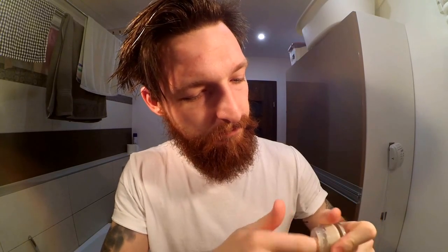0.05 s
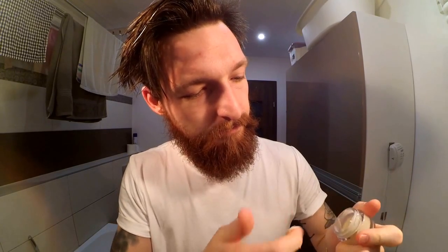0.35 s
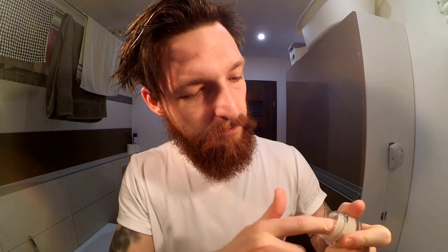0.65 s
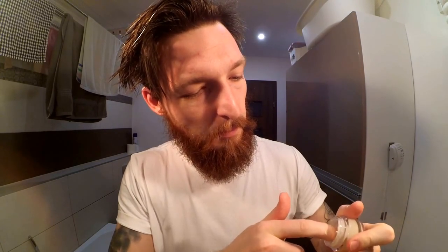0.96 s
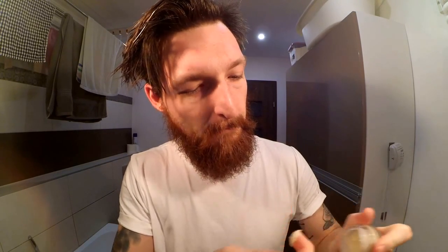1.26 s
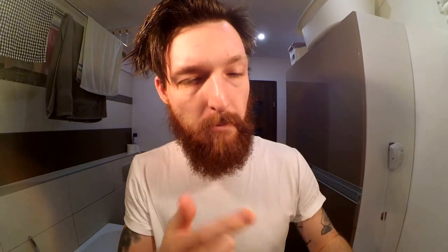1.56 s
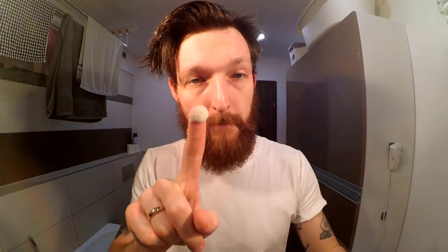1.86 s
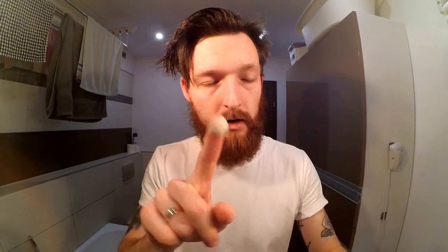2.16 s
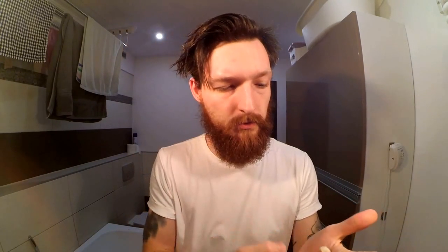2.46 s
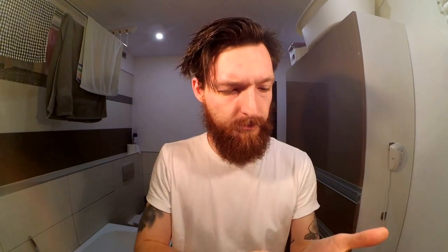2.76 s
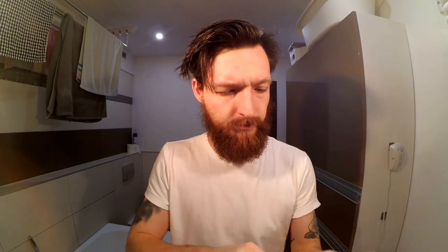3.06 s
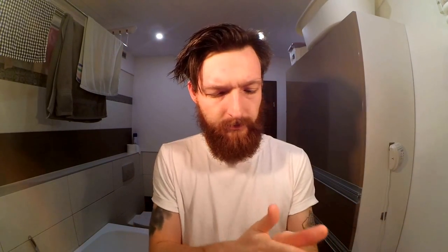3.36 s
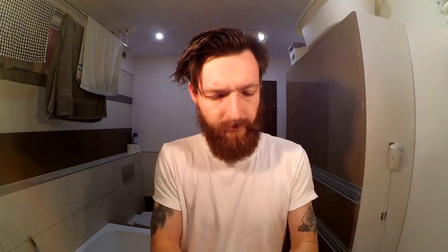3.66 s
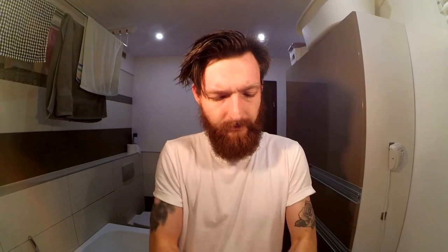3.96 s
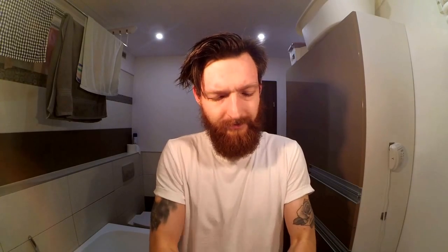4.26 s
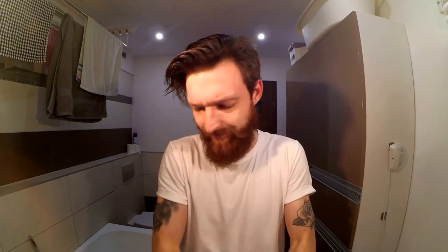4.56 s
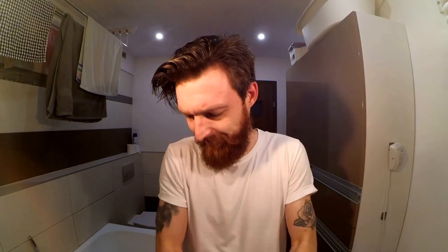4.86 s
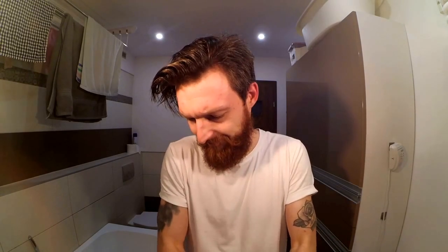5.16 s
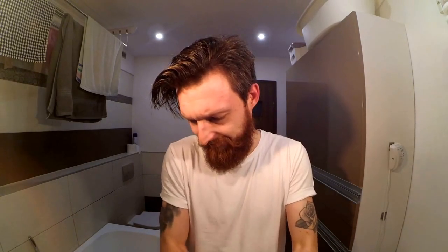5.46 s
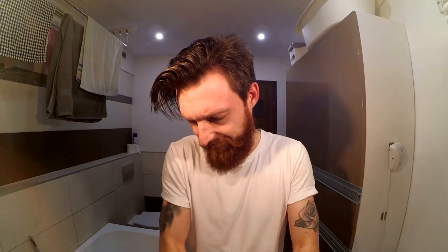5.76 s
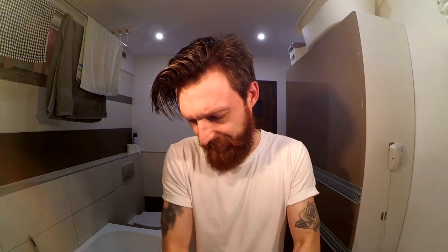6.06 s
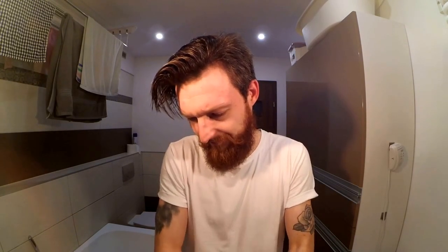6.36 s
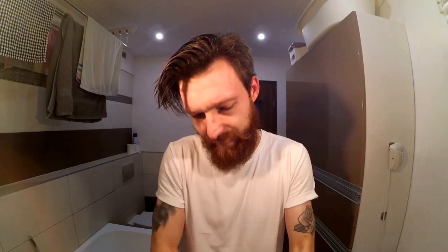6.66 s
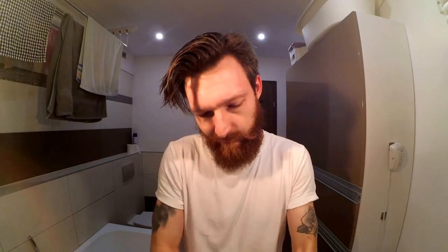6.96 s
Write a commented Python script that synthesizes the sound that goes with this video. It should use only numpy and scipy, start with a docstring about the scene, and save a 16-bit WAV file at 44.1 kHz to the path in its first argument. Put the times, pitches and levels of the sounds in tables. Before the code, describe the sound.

Faint sticky ticks, one hard ringing knock of a jar set down, then a light clap and quick, hissing hand rubbing.

```python
"""Hair product in a tiled bathroom

A finger scoops product from a little jar, with a skid and a few sticky ticks. The jar is set down
hard and rings with the counter. The palms clap together and rub back and forth, hissing, while the
pocket of air between them sounds hollow. A faint hum and a slow rumble lie underneath."""
import sys
import numpy as np
from scipy import signal
from scipy.fft import rfft, irfft
from scipy.io import wavfile
from scipy.ndimage import uniform_filter1d

SR = 44100
rng = np.random.default_rng(int(sys.argv[2]) if len(sys.argv) > 2 else 0)


def dump(signal):
    """Clip the signal to [-1, 1] and save it as 16-bit WAV at the path in sys.argv[1]."""
    limited = np.clip(np.atleast_2d(signal).T, -1, 1)
    pcm = np.round(limited * 32767).astype(np.int16)
    wavfile.write(sys.argv[1], SR, pcm)


N = 317961
TIME = np.arange(N) / SR
SHOT_TIME = np.arange(SR // 2) / SR  # half a second, for one-shots and tails

# Palm strokes, back and forth in turn. Each row: moment of top speed in seconds, length in seconds,
# friction level in dB, level of the hollow in dB.
STROKES = [(3.483, .07, -56.5, -78), (3.68, 0.11, -55, -85), (3.855, 0.086, -59.5, -74),
           (4.065, 0.08, -54, -57), (4.189, 0.039, -50.5, -60.5), (4.352, 0.062, -51.5, -52.5),
           (4.494, 0.054, -53, -57), (4.653, 0.056, -53, -50.5), (4.808, 0.044, -51.5, -57.5),
           (4.981, 0.055, -53, -48), (5.137, 0.061, -54.5, -54), (5.317, 0.052, -52.5, -54.5),
           (5.484, 0.054, -53, -55), (5.706, 0.1, -59.5, -63), (5.862, 0.072, -55.5, -61),
           (6.082, 0.14, -60, -54), (6.272, 0.049, -56.5, -58), (6.466, 0.093, -57.5, -58.5),
           (6.629, 0.049, -53.5, -49.5), (6.797, 0.091, -62.5, -81), (6.957, 0.056, -58, -62),
           (7.119, 0.082, -59, -76)]
# Smooth hiss and coarser rasp of skin. Each row: frequency in Hz, relative level in dB.
HISS_EQ = [(300, -11.5), (1000, -23.5), (2500, -22.5), (4500, -3.5), (6000, -5.5), (7800, -4.5),
           (10000, -6), (13000, -8.5), (15500, -11)]
RASP_EQ = [(300, -7), (800, -2), (1700, -2.5), (2300, -4.5), (3200, -2), (4500, -1), (5600, -3), (7500, -2),
           (15000, -21)]
# The palms roughen as the product works in. Each row: time in seconds, dryness as rasp gain in dB.
DRYNESS = [(3.6, -15), (4.2, -3.5), (6.7, -2), (7.1, 1.5)]
# Wet palms swish, drying palms grab. Each row: centre in Hz, width in Hz, level in dB,
# dB gained per dB of dryness.
SKIN_BANDS = [(7400, 2900, -17, -0.97), (3350, 2200, -7, 5.5)]

def rubbing(hiss_db, rasp_db, crackle_db=-11, snaps_per_s=500, back_db=0.5, turn_db=-9, ring_db=-18.5):
    """Skin ridges slip past each other, rasping most at top speed; threads of tacky film snap."""
    swell_share, rasp_power = 0.63, 1.69
    speeds = np.array([slide(TIME - s, swell_share * length, (1 - swell_share) * length)
                       for s, length, _, _ in STROKES])
    force = amp([db for _, _, db, _ in STROKES])
    grip = force * amp(back_db * (np.arange(len(STROKES)) % 2 == 0))  # more rasp on the way back
    glide = np.sqrt(force ** 2 @ speeds ** 2)
    scrape = np.sqrt(grip ** 2 @ speeds ** (2 * rasp_power))
    dry_db = np.interp(TIME, *np.transpose(DRYNESS))
    snaps = rng.standard_normal(N) * (rng.random(N) < snaps_per_s / SR)
    crackle = unit(signal.fftconvolve(snaps, pulse(TICK_EQ))[:N])
    coarse = amp(dry_db) * (amp(rasp_db) * noise(RASP_EQ) + amp(crackle_db) * crackle)
    colour = sum(amp(db + slope * dry_db) * band(hz, width) for hz, width, db, slope in SKIN_BANDS)
    skin = amp(hiss_db) * glide * noise(HISS_EQ) + scrape * (coarse + colour)
    # A little rasp and a low ring near 470 Hz carry through the turns.
    effort = uniform_filter1d(glide, 22000)
    contact = effort * (amp(turn_db) * noise(RASP_EQ) + amp(ring_db) * band(*CLAP_RINGS[1][:2]))
    return (skin + contact) * flutter(depth_db=1.4, size=16) * flutter(depth_db=1.25, size=260)


# The hollow on the way back, then forth. Each row: base pitch in Hz, rise in octaves per second,
# swell and fade time in seconds, lead on top speed in seconds.
HOLLOWS = [(1130, 11, 0.0079, .011), (1270, 3.3, 0.017, 0.00101)]

def air_pocket(level_db, relative_width, usual_squeeze_db=-55, octaves_per_db=.026):
    """Each stroke rings the hollow between the palms, higher as it closes and with a harder squeeze."""
    out, t = np.zeros(N), SHOT_TIME - SHOT_TIME.mean()
    for k, (s, _, _, db) in enumerate(STROKES):
        hz, octaves_per_s, length, lead = HOLLOWS[k % 2]
        closing = octaves_per_s * np.clip(t, -2 * length, 2 * length)
        pitch = hz * 2 ** (closing + octaves_per_db * (db - usual_squeeze_db))
        hollow = band(pitch, relative_width * hz, len(t))
        add(out, s - lead + t[0], amp(db + level_db) * hollow * slide(t, length, length))
    return out


# The jar lands, rim first. Each row: start in seconds, gain in dB.
KNOCKS = [(1.9793, -33.5), (1.989, 1.4)]
# The attack of the knock. Each row: frequency in Hz, relative level in dB.
BLOW_EQ = [(100, -28), (260, -13), (480, -7.5), (900, -10), (1400, -3), (2300, -3), (3700, 2.5),
           (4700, -5.5), (5600, -13.5), (8000, -23.5), (11000, -30), (16000, -35)]
# The ring of jar and counter. Each row: pitch in Hz, relative level in dB, seconds to fall 60 dB.
JAR_MODES = [(431.6, -36, .2), (669, -31, 0.26), (740, -40, 0.17), (1306, -23.5, 0.06), (1750, -31, 0.13),
             (2629, -29.5, 0.099), (2778, -33, .07), (3270, -32, .07), (3900, -29, .08), (3964, -28, .12),
             (4930, -35, .07)]

def jar_knock(ring_db):
    """A hard blow sets jar and counter ringing."""
    hit = amp(ring_db) * sum(amp(db - 60 * SHOT_TIME / t60) * np.sin(2 * np.pi * hz * SHOT_TIME)
                             for hz, db, t60 in JAR_MODES)
    add(hit, 0, -pulse(BLOW_EQ))
    out = np.zeros(N)
    for s, db in KNOCKS:
        add(out, s, amp(db) * hit)
    return out


# The hands meet, fingers first. Each row: start in seconds, level in dB, decay in seconds.
CLAPS = [(3.3613, -51.5, 0.0025), (3.3688, -37.5, 0.01)]
# The tone of the clap. Each row: frequency in Hz, relative level in dB.
CLAP_EQ = [(100, 7), (300, 4), (700, 5), (1300, -7), (1900, 10.5), (2400, -18), (3000, -4), (3800, 5.5),
           (5500, -6.5), (9000, -9.5), (15000, -22)]
# Rings stirred by the clap; the rubbing also stirs the low one near 470 Hz.
# Each row: pitch in Hz, width in Hz, relative level in dB.
CLAP_RINGS = [(250, 130, -9), (468.6, 53, -3), (840, 120, -19), (1620, 100, -6), (1955, 45, -7)]

def clap(ring_db):
    """A short puff of air is squeezed from between the palms and stirs a few brief rings."""
    puff, colour = np.zeros(N), pulse(CLAP_EQ)
    for s, db, decay_s in CLAPS:
        add(puff, s, amp(db) * rng.standard_normal(len(SHOT_TIME)) * np.exp(-SHOT_TIME / decay_s))
    rings = sum(amp(db + ring_db) * unit(resonate(puff, hz, width)) for hz, width, db in CLAP_RINGS)
    return signal.fftconvolve(puff, colour / np.linalg.norm(colour))[:N] + puff.std() * rings


# Sticky snaps, the jar touching down, the fingers meeting before the clap.
# Each row: start in seconds, peak in dB, tilt above 1 kHz in dB per octave.
TICKS = [(0.187, -46, -6), (1.2633, -27.5, -2), (1.484, -50, -17), (1.6306, -42.5, -10),
         (1.793, -39.5, -11), (1.9795, -34.5, -2), (3.3615, -39.5, 4), (4.556, -52, -3), (5.177, -43, -15)]
# The tone of one tick. Each row: frequency in Hz, relative level in dB.
TICK_EQ = [(300, -24), (1800, -25.5), (3400, -3), (5000, -11), (7200, 0), (10000, -15.5), (13000, -3),
           (16000, -35)]

def small_ticks(scoop_end_s=3.3, faint_per_s=9, faint_db=-47.5):
    """Sticky snaps and light touches tick, with fainter ticks at random while the finger scoops."""
    faint = rng.random(N) * (rng.random(N) < faint_per_s / SR) * (TIME < scoop_end_s)
    out = amp(faint_db) * signal.fftconvolve(faint, pulse(TICK_EQ))[:N]
    for s, db, tilt_db in TICKS:
        add(out, s, amp(db) * pulse(TICK_EQ, tilt_db))
    return out


# The jar wall under a finger. Each row: pitch in Hz, width in Hz, relative level in dB.
WALL_MODES = [(2086, 86, -6.5), (3220, 84, -2.5), (4080, 120, -1.5), (6150, 2100, -1), (8000, 5700, -14)]

def finger_skid(at_s, db, swell_s, fade_s, slips_per_s):
    """A quick run of slips rings the wall of the jar."""
    slips = (rng.random(N) < slips_per_s / SR) + .02 * rng.standard_normal(N)
    slips -= slips.mean()
    wall = sum(amp(mode_db) * unit(resonate(slips, hz, width)) for hz, width, mode_db in WALL_MODES)
    return amp(db) * unit(wall) * slide(TIME - at_s, swell_s, fade_s)


# Weight under knock and clap. Each row: start in seconds, level in dB, pitch in Hz, decay in seconds.
THUDS = [(1.979, -30.5, 303, 0.0032), (2.003, -30, 48, 0.056), (2.006, -36.5, 103.4, .07),
         (2.217, -35.5, 30.9, 0.12), (3.3691, -26.5, 120.4, 0.0037)]

def thuds():
    """Soft low pushes of the jar on the counter and of palm on palm die away quickly."""
    out = np.zeros(N)
    for s, db, hz, decay_s in THUDS:
        add(out, s, -amp(db) * np.sin(2 * np.pi * hz * SHOT_TIME) * np.exp(-SHOT_TIME / decay_s))
    return out


# Slaps off counter, mirror and near walls. Each row: delay in seconds, level in dB.
ECHOES = [(.0009, -14.5), (.0014, -13), (.0031, -5.5), (.0041, -15), (.0052, -7), (.0157, -10.5)]

def near_walls(x, scatter_s=0.0026):
    """Hard surfaces around the jar return early echoes, each trailed by a little scatter."""
    echoes = np.zeros(len(SHOT_TIME))
    for delay, db in ECHOES:
        echo = rng.standard_normal(len(SHOT_TIME)) * np.exp(-SHOT_TIME / scatter_s) / 10
        echo[0] = 1
        add(echoes, delay, amp(db) * echo)
    return x + signal.fftconvolve(x, echoes)[:N]


# The bathroom's tail. Each row: frequency in Hz, seconds to fall 60 dB.
ROOM_T60 = [(100, .45), (500, .4), (1000, .31), (3500, .3), (6000, .27), (12000, .25)]

def room(x, wet_db, build_s=0.002, tap_chance=1 / 8):
    """Dense reflections off the tiles build up quickly and die band by band."""
    size = len(SHOT_TIME)
    taps = rng.choice([-1., 1.], size) * (rng.random(size) < tap_chance)
    hz, t, spectrum = signal.stft(taps, SR, nperseg=256)
    decay = amp(-60 * t / curve_at(ROOM_T60, hz)[:, None])
    tail = signal.istft(spectrum * decay, SR)[1][:size]
    tail *= 1 - np.exp(-(SHOT_TIME / build_s) ** 2)
    return x + amp(wet_db) * signal.fftconvolve(x, tail / np.linalg.norm(tail))[:N]


def moving_room(x, wet_db, count=3):
    """The hands keep moving, so their reflections drift from one pattern to the next."""
    shares = [np.cos(np.pi * (2 * TIME + k / count)) * np.sqrt(2 / count) for k in range(count)]
    return x + sum(room(x * share, wet_db) - x * share for share in shares)


# Still air, a low whirr and the tones of the hum. Each row: frequency in Hz, relative level in dB.
AIR_EQ = [(25, 1), (45, -6.5), (65, -3.5), (90, -14), (170, -12.5), (300, -18), (700, -19.5), (1700, -22.5),
          (2300, -27.5), (3800, -27), (5500, -30), (7200, -29), (10000, -32), (15000, -34)]
WHIRR_EQ = [(30, 13), (65, 15), (130, 3), (300, -5), (700, -23), (1400, -17), (2200, -42), (8000, -48)]
HUM_TONES = [(602, -79.5), (802, -77.5), (899.5, -73.5), (1200, -73.5), (1400, -82), (1728, -80.5),
             (3880, -86.5)]
# Fader moves for hum with whirr, and for rumble. Each row: time in seconds, gain in dB.
HUM_FADER = [(0, 0.5), (1.95, 0.5), (2.3, -1.5), (3.4, -3.5), (7.2, -6.5)]
RUMBLE_FADER = [(0.3, -37.5), (0.7, -45), (1.3, -42.5), (1.55, -31.5), (1.92, -34), (2.1, -47), (3.8, -43),
                (7.2, -44)]

def room_tone(air_db, whirr_db, hum_db, rumble_db):
    """Still air, a faint hum and whirr that sink after the knock, and a rumble below hearing."""
    tones = sum(amp(db) * np.sin(2 * np.pi * (hz * TIME + rng.random())) for hz, db in HUM_TONES)
    hum = amp(hum_db) * tones * flutter(depth_db=-1.3, size=20000) + amp(whirr_db) * noise(WHIRR_EQ)
    hum *= amp(np.interp(TIME, *np.transpose(HUM_FADER)))
    rumble = noise([(2, -14), (6, -6.0), (9, -3), (13, -7.0), (22, -21.5), (40, -52), (200, -110)])
    rumble *= amp(rumble_db + np.interp(TIME, *np.transpose(RUMBLE_FADER)))
    return amp(air_db) * noise(AIR_EQ) + hum + rumble


# The stereo side noise. Each row: frequency in Hz, relative level in dB.
SIDE_EQ = [(20, 24), (70, 14), (200, -25.5), (600, -41), (2500, -40), (4500, -29), (8000, -32.5),
           (12000, -33), (15000, -36)]

def side_noise(db):
    """Faint noise that gives a slight stereo width."""
    return amp(db) * noise(SIDE_EQ)


def amp(db):
    """Decibels to gain."""
    return 10 ** (np.asarray(db) / 20)


def unit(x):
    """Scales to rms 1."""
    return x / np.sqrt(np.mean(x ** 2) + 1e-20)


def curve_at(points, hz):
    """Reads a curve on a log-frequency axis."""
    freqs, values = np.transpose(points)
    return np.interp(np.log(hz + 1), np.log(freqs), values)


def add(mix, s, sound):
    """Mixes a sound in at s seconds."""
    part = mix[round(s * SR):][:len(sound)]
    part += sound[:len(part)]


def noise(eq):
    """Steady noise of rms 1, shaped by an EQ curve."""
    hz = np.fft.rfftfreq(N, 1 / SR)
    return unit(irfft(rfft(rng.standard_normal(N)) * amp(curve_at(eq, hz)), N))


def pulse(eq, tilt_db=0, size=4096):
    """A minimum-phase click of peak 1, shaped by an EQ curve and a tilt per octave above 1 kHz."""
    hz = abs(np.fft.fftfreq(size, 1 / SR))
    log_gain = np.log(amp(curve_at(eq, hz) + tilt_db * np.log2(np.maximum(hz / 1000, 1))))
    spectrum = np.exp(np.conj(signal.hilbert(log_gain)))
    click = np.fft.ifft(spectrum).real[:size // 2]
    return click / abs(click).max()


def resonate(x, hz, width):
    """A resonance that can follow a moving pitch."""
    carrier = np.exp(2j * np.pi * np.cumsum(hz * np.ones(len(x))) / SR)
    pole = np.exp(-np.pi * width / SR)
    return 2 * (carrier * signal.lfilter([1 - pole], [1, -pole], x / carrier)).real


def band(hz, width, size=N):
    """Noise of rms 1 in one steep resonance."""
    return unit(resonate(resonate(rng.standard_normal(size), hz, width), hz, width))


def slide(t, swell_s, fade_s):
    """Envelope of a slide that speeds up until t = 0 and then brakes."""
    return np.exp(-.5 * abs(t / np.where(t < 0, swell_s, fade_s)) ** 1.5)


def flutter(depth_db, size):
    """A random gain that changes about every size samples."""
    return amp(depth_db * unit(uniform_filter1d(rng.standard_normal(N), size)))


def scene():
    """Jar and hands in the tiled room, in narrow stereo."""
    jar = room(near_walls(jar_knock(ring_db=-4)), wet_db=-4.5, build_s=0.001)
    ticks = room(small_ticks(), wet_db=-2.5)
    skid = finger_skid(at_s=.36, db=-50.5, swell_s=0.0025, fade_s=0.0061, slips_per_s=1800)
    handling = ticks + room(skid, wet_db=1.5)
    touching = TIME > CLAPS[-1][0]  # friction starts when the palms have met
    palms = touching * rubbing(hiss_db=-3.0, rasp_db=0.5)
    palms += air_pocket(level_db=-2.5, relative_width=0.25)
    hands = moving_room(palms, wet_db=-4.5) + room(clap(ring_db=-10), wet_db=-1.5)
    bed = room_tone(air_db=-61.5, whirr_db=-57.5, hum_db=2.5, rumble_db=2.0)
    mid = jar + handling + hands + thuds() + bed
    side = side_noise(db=-66)
    return np.array([mid + side, mid - side])


def record(dry):
    """A steep low-pass trims the highest treble."""
    edge_hz = 15400
    low_pass = signal.firwin(255, edge_hz, window=("kaiser", 8), fs=SR)
    return signal.oaconvolve(dry, low_pass[None], "same", axes=1)


dry = scene()
out = record(dry)
dump(out)
```